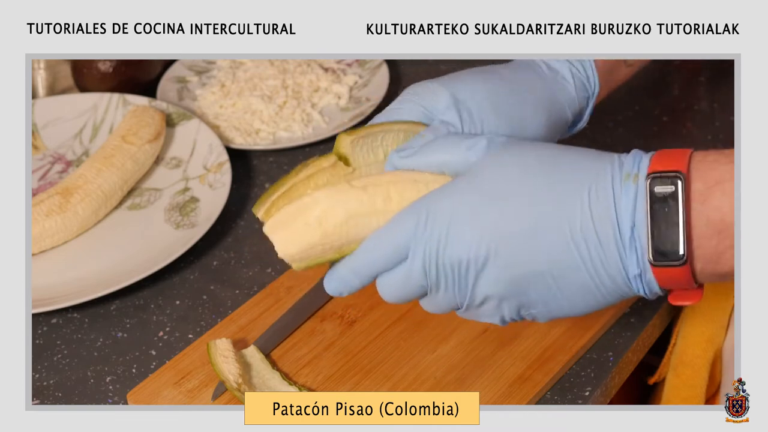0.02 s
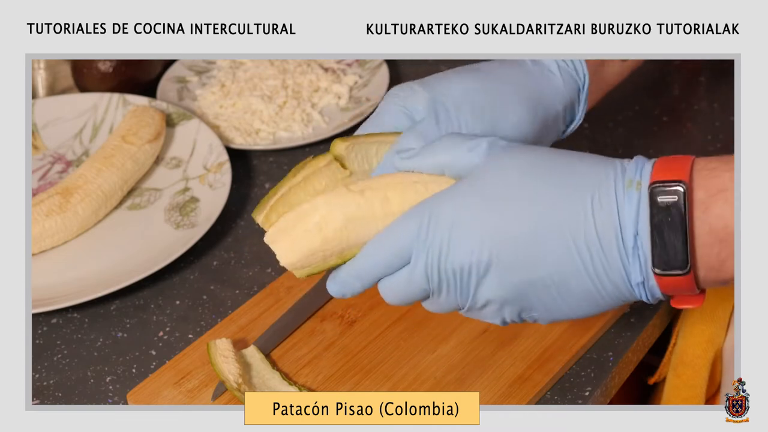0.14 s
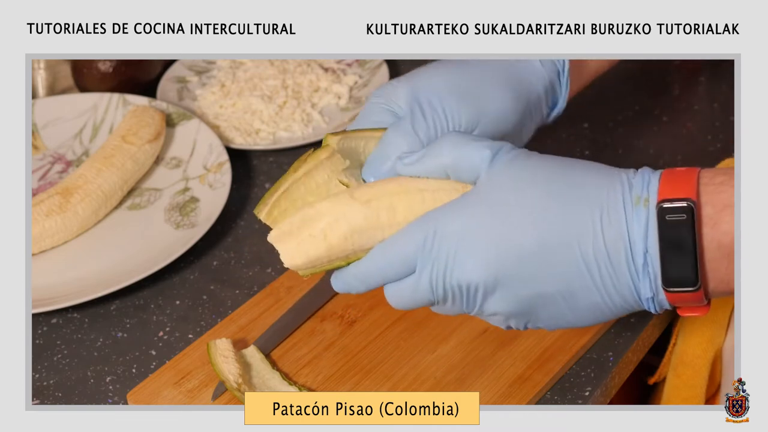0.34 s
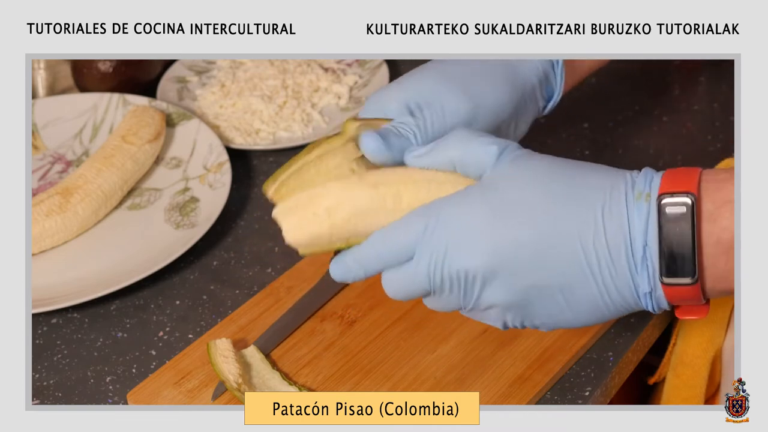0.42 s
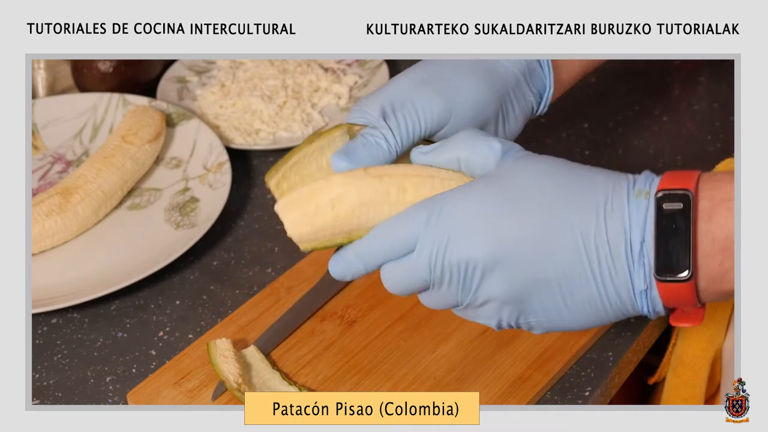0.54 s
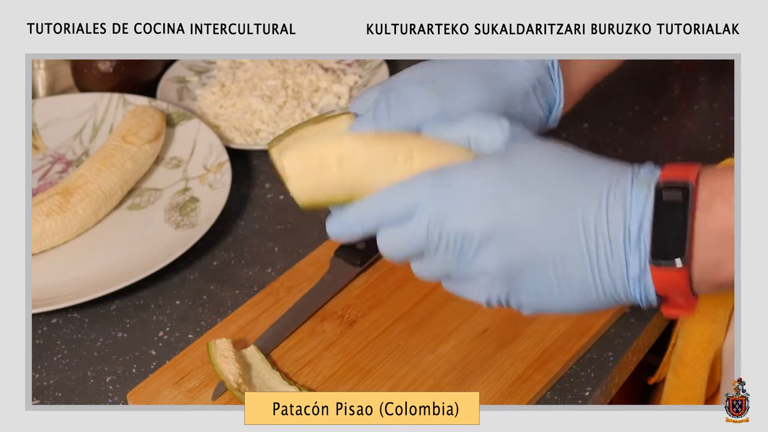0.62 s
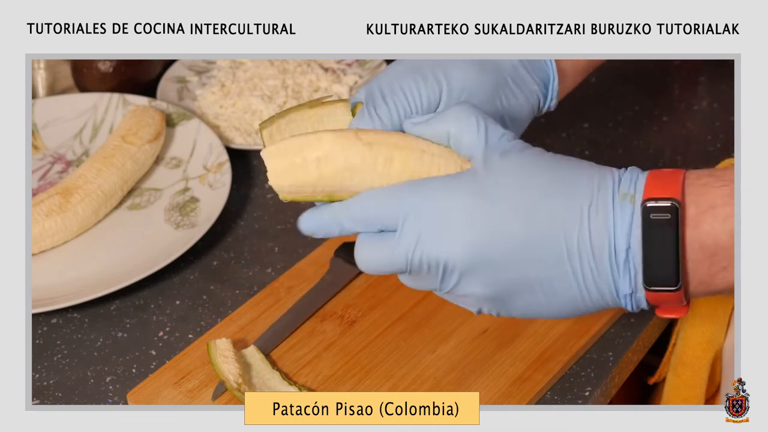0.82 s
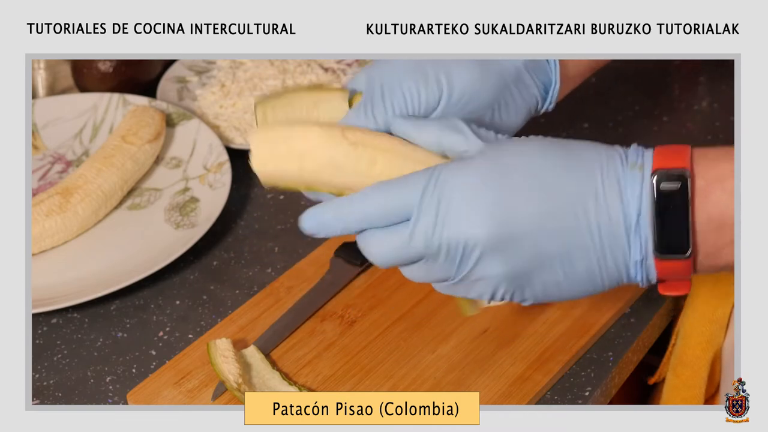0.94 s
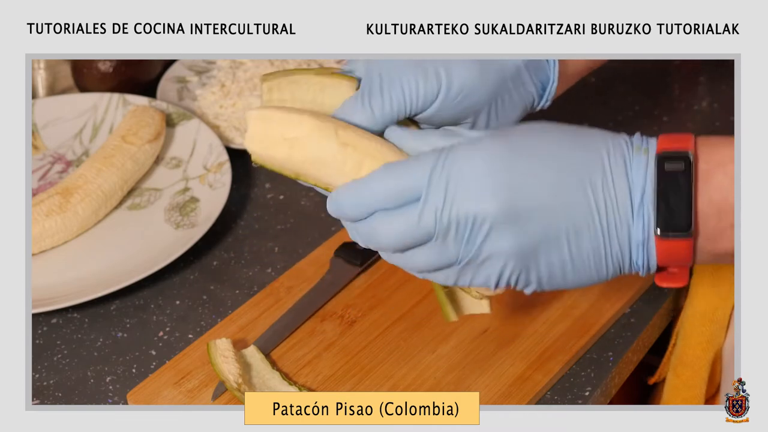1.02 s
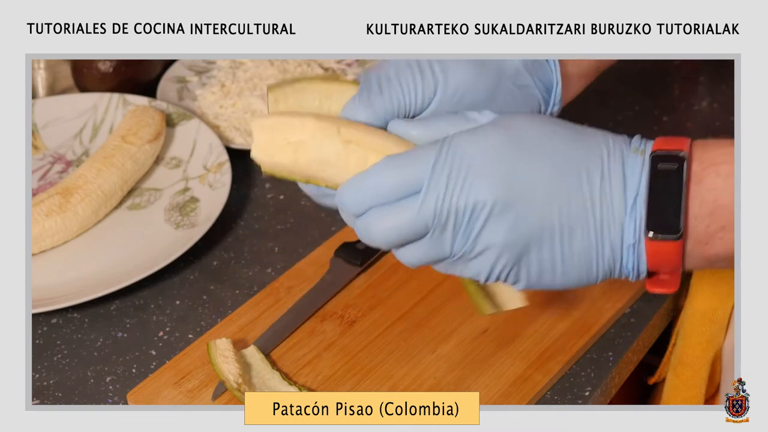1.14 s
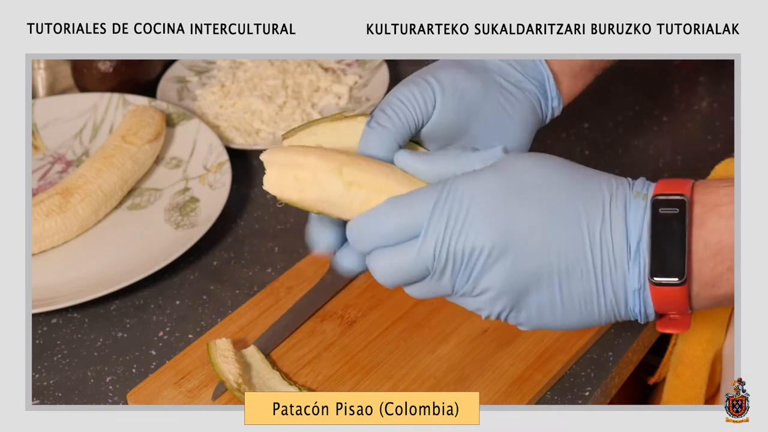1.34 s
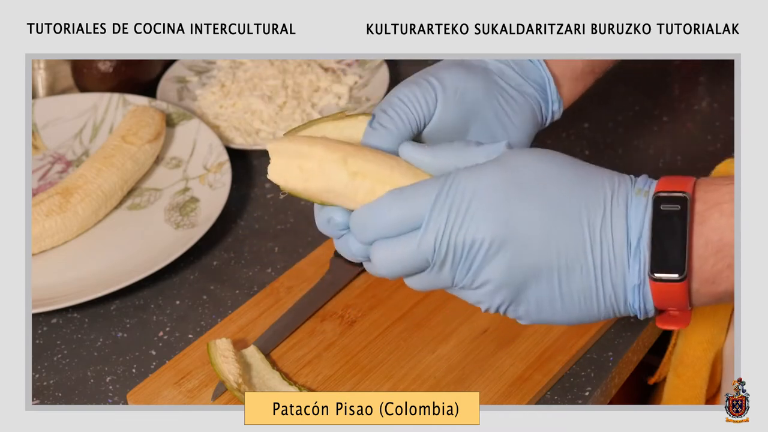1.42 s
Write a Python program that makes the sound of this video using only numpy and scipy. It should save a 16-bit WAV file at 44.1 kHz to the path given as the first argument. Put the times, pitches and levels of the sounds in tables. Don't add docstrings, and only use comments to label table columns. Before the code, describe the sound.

Plantain skin being torn off in sharp snaps and short crackles, over faint kitchen hum

```python
import sys
import numpy as np
from scipy import signal
from scipy.fft import rfft, irfft, next_fast_len
from scipy.io import wavfile
from scipy.ndimage import map_coordinates

SR = 44100
rng = np.random.default_rng(int(sys.argv[2]) if len(sys.argv) > 2 else 0)


def materialize(psi):
    bounded = np.clip(np.atleast_2d(psi).T, -1, 1)
    quanta = np.round(bounded * 32767).astype(np.int16)
    wavfile.write(sys.argv[1], SR, quanta)


def voltage_ratio(level):
    return 10 ** (np.asarray(level, float) / 20)


N = 66150
T_S = np.arange(N) / SR

# f/Hz, density/dB per Hz
AIR_SPECTRUM = [(25, -32), (50, -16.5), (100, -17.5), (300, -12), (480, -18), (1100, -14), (2000, -21),
                (7000, -27.5), (15500, -40)]
# f/Hz, rms level/dB, unsteadiness/dB
APPLIANCE_TONES = [(49.5, -77, 0), (102.2, -73, -3), (147.7, -77, 2), (328.3, -68.5, 2), (690, -80, 5.5),
                   (885, -74.5, 0.5), (1104, -81, 3.5), (1338, -76, -3)]
# centre t/s, length/s, level/dB, f/Hz
PALM_RUBS = [(0.036, 0.055, -54.5, 269), (0.12, 0.028, -56, 273), (0.228, 0.025, -51.5, 297),
             (.37, .04, -61.5, 310), (1.345, 0.031, -63, 206), (1.348, 0.03, -59.5, 470),
             (1.44, 0.073, -63, 303), (0.028, 0.075, -62.5, 710), (0.435, .07, -66.5, 2900),
             (0.437, 0.044, -69, 8400), (1.27, .03, -64, 109), (.235, .012, -59, 120),
             (0.7, 0.14, -70, 9000)]
# centre t/s, length/s, level/dB, f/Hz
SHORT_RUB = (1.05, .005, -62, 3500)
# t/s, peak level/dB, hollow body share/dB, burst t60/s
FIBRE_SNAPS = [(0.0276, -49, -10, 0.015), (0.056, -47, -2, .008), (.0657, -44, 1, 0.0073),
               (.0815, -40, -10, .009), (0.1055, -42, -4, .009), (0.1143, -37.5, 2, 0.0091),
               (0.13, -46, -6, 0.006), (0.1356, -37, 17, .008), (0.182, -25.5, 2, 0.0089),
               (0.2125, -16, 8, 0.016), (0.228, -24, -1, 0.023), (.393, -51, -4, 0.014),
               (0.5987, -31.5, -12, 0.0069), (.634, -24, -24, 0.039), (0.14, -45, -10, .009),
               (1.103, -44, -14, .007), (1.126, -45, -4, 0.0096), (1.154, -25, -1, 0.021),
               (1.169, -26, -1, 0.021), (1.1925, -28.5, 4, 0.015), (1.2003, -32, -3, .008),
               (1.2024, -23.5, 1, 0.03), (1.228, -21, -8, 0.011), (1.2316, -28, -2, 0.013),
               (1.2854, -42.5, -21, .007), (1.4242, -49, -15, 0.0097), (1.4456, -51, -6, 0.01),
               (1.4592, -40, -18, 0.0054), (1.4904, -31, -19, 0.0069), (1.4974, -34, -13, 0.01)]
# f/Hz, width/Hz, level/dB
SKIN_MODES = [(1110, 1970, -6), (3200, 900, 1.5), (4400, 500, -3.5), (6100, 570, 3.5), (9040, 1660, -4),
              (12300, 2400, -8.5)]
BODY_SHARE = [1, .6, .4, 0, 0, 0]
# peak t/s, level/dB, rise/dB per s, fall/dB per s, flap f/Hz
TEAR_STROKES = [
    (.108, -53.5, 303, 63, 8000),
    (.145, -61.5, 198, 131, 11300),
    (0.229, -42.5, 1500, 434, 3930),
    (.638, -35, 560, 1600, 4200),
    (0.659, -45, 177, 421, 4050),
    (1.127, -57, 598, 400, 6000),
    (1.21, -48.5, 347, 246, 3200),
    (1.233, -53, 1200, 422, 6100),
    (1.426, -60, 900, 250, 11300),
    (1.498, -60.5, 255, 298, 6050),
]
# f/Hz, density/dB per Hz
FIBRE_SPECTRUM = [(400, -6), (1200, -0.5), (2500, -13), (4100, -6.5), (5000, -24), (6200, -12), (10600, -2),
                  (15500, -13.5)]
POP_TIMES = [
    .2142,
    .229,
    .236,
    .629,
    .157,
]
# peak level/dB, ring level/dB, push f/Hz
SKIN_POPS = [
    (-13.5, -32, 1500),
    (-24, -32, 790),
    (-29, -31, 1200),
    (-27, -43.5, 1400),
    (-40.5, -48.5, 1700),
]
# f/Hz, level/dB, t60/s
FRUIT_MODES = [(284, -9.5, 0.23), (913, -8, 0.18), (1195, 2, 0.17), (1320, -7, 0.11), (1435, -16.5, 0.12),
               (1440, -19.5, 0.22), (1730, -38, 0.14), (1940, -11.5, 0.15), (2110, -14, 0.16),
               (3050, -20.5, 0.31), (3270, -25, 0.092), (3660, -19.5, 0.16)]
# f/Hz, t60/s
ROOM_DECAY = [(200, 0.38), (1200, 0.24), (5000, 0.26), (14000, 0.08)]

AIR_DB, WET_DB = -58.5, -11
SNAP_LAG_S = 0.0013
GRAINS_PER_S, GRAIN_HZ, GRAIN_SPREAD_OCT, GRAIN_SPREAD_DB, GRAIN_CYCLES = 3500, 8600, 0.54, 4, 1.6
GRAIN_SAMPLES = 128
HISS_DB, FLAP_DB, FLAP_REL_WIDTH = 1, -12, 0.07
EDGE_DB, EDGE_STEEPENS = 16, 3.7
BELLY_HZ, BELLY_DB, BELLY_T60_S, BELLY_ONSET_S = 730, -5.5, 0.019, 0.00033
RING_T60_SHARE, RING_ONSET_S = 0.42, 0.00086
RUMBLE_CUT_HZ, TOP_HZ, LEAK_DB = 138, 15700, -34


def unit(x):
    return x / np.sqrt(np.mean(x ** 2) + 1e-20)


def along(points, hz):
    f, value = np.transpose(points)
    return np.interp(np.log(hz + 1), np.log(f + 1), value)


def wobble(rate_hz):
    knots = rng.standard_normal(int(N * rate_hz / SR) + 4)
    return map_coordinates(knots, [T_S * rate_hz])


def filtered(x, response):
    size = next_fast_len(x.shape[-1] + 8192)
    hz = np.fft.rfftfreq(size, 1 / SR)
    return irfft(rfft(x, size) * response(hz), size)[..., :x.shape[-1]]


def peak(f, hz, width_hz):
    return 1j * f * width_hz / (hz * hz - f * f + 1j * f * width_hz)


def add(track, start_s, sound):
    part = track[round(start_s * SR):][:len(sound)]
    part += sound[:len(part)]


def background():
    noise = rng.standard_normal(N)
    air = unit(filtered(noise, lambda f: voltage_ratio(along(AIR_SPECTRUM, f)) * (f > 25)))
    out = air * voltage_ratio(AIR_DB - 0.7 + 0.23 * wobble(9.4))
    for hz, rms_db, shake_db in APPLIANCE_TONES:
        level = np.sqrt(2) * voltage_ratio(rms_db + shake_db * wobble(14))
        phase = 2 * np.pi * hz * T_S + 0.24 * shake_db * wobble(12)
        out += level * np.sin(phase)
    return out


def rubs():
    out = np.zeros(N)
    for centre_s, length_s, db, hz in PALM_RUBS + [SHORT_RUB]:
        swell = np.exp(-0.5 * ((T_S - centre_s) / length_s) ** 2)
        noise = filtered(rng.standard_normal(N), lambda f: peak(f, hz, 0.41 * hz) ** 2)
        out += voltage_ratio(db) * swell * unit(noise)
    return out


def snaps():
    out = np.zeros(N)
    t = np.arange(2048) / SR
    for start_s, db, body_db, t60_s in FIBRE_SNAPS:
        burst = 0.32 * rng.standard_normal(len(t)) * voltage_ratio(-60 * t / t60_s)
        burst[0] -= 1.8
        tint_db = rng.normal(0, 2.6, len(SKIN_MODES)) + body_db * np.array(BODY_SHARE)

        def skin(f):
            total = 0.082
            for k, (hz, width_hz, mode_db) in enumerate(SKIN_MODES):
                total = total + (-1) ** k * voltage_ratio(mode_db + tint_db[k]) * peak(f, hz, width_hz)
            return total

        sound = filtered(burst, skin)
        add(out, start_s + SNAP_LAG_S, voltage_ratio(db) * sound / np.abs(sound).max())
    return out


def crackle():
    count = int(GRAINS_PER_S * N / SR)
    place, rarity = rng.random((2, count, 1))
    octaves, sign = rng.standard_normal((2, count, 1))
    hz = np.clip(GRAIN_HZ * 2 ** (GRAIN_SPREAD_OCT * octaves), 1500, 15000)
    t = np.arange(GRAIN_SAMPLES) / SR
    level = voltage_ratio(-GRAIN_SPREAD_DB * np.log(rarity + 1 / 30)) * np.sign(sign)
    ticks = level * np.sin(2 * np.pi * hz * t) * np.exp(-np.pi * hz * t / GRAIN_CYCLES)
    where = (place * N).astype(int) + np.arange(GRAIN_SAMPLES)
    return unit(np.bincount(where.ravel(), ticks.ravel(), N + GRAIN_SAMPLES)[:N])


def tears():
    noise = rng.standard_normal(N)
    hiss = unit(filtered(noise, lambda f: voltage_ratio(along(FIBRE_SPECTRUM, f)) * (f > 300)))
    source = unit(crackle() + voltage_ratio(HISS_DB) * hiss)
    clumps = voltage_ratio(2.7 * wobble(220))
    out = np.zeros(N)
    for peak_s, db, rise_db_s, fall_db_s, flap_hz in TEAR_STROKES:
        flap = unit(filtered(source, lambda f: peak(f, flap_hz, FLAP_REL_WIDTH * flap_hz)))
        under_db = np.where(T_S < peak_s, rise_db_s * (peak_s - T_S), fall_db_s * (T_S - peak_s))
        edge_db = EDGE_STEEPENS * np.maximum(under_db - EDGE_DB, 0)
        out += voltage_ratio(db - under_db - edge_db) * (source + voltage_ratio(FLAP_DB) * flap)
    return clumps * out


def fruit_ring(t):
    ring = np.zeros(len(t))
    for hz, db, t60_s in FRUIT_MODES:
        level = voltage_ratio(db + rng.normal(0, 1.4) - 60 * t / (RING_T60_SHARE * t60_s))
        drift = 0.049 * np.cumsum(rng.standard_normal(len(t)))
        ring += level * np.sin(2 * np.pi * (hz * t + rng.random()) + drift)
    return ring * (1 - np.exp(-t / RING_ONSET_S))


def pops():
    out = np.zeros(N)
    t = np.arange(SR // 4) / SR
    for start_s, (db, ring_db, push_hz) in zip(POP_TIMES, SKIN_POPS):
        cycles = t * push_hz
        push = np.sin(2 * np.pi * cycles) * cycles * np.exp(-2.05 * cycles)
        push = push / np.abs(push).max()
        belly = voltage_ratio(BELLY_DB - 60 * t / BELLY_T60_S) * np.sin(2 * np.pi * BELLY_HZ * t)
        belly = belly * (1 - np.exp(-t / BELLY_ONSET_S))
        add(out, start_s, voltage_ratio(db) * (push + belly) + voltage_ratio(ring_db) * fruit_ring(t))
    return out


def kitchen(x):
    hz, t, bins = signal.stft(rng.standard_normal(SR // 2), SR, nperseg=256)
    decay = voltage_ratio(-60 * t / along(ROOM_DECAY, hz)[:, None])
    tail = signal.istft(bins * decay, SR, nperseg=256)[1]
    delayed = np.pad(x, (120, 0))
    return signal.fftconvolve(delayed, tail / np.linalg.norm(tail))[:N]


def scene():
    hands = snaps() + tears() + pops()
    near = filtered(hands, lambda f: (1j * f / (RUMBLE_CUT_HZ + 1j * f)) ** 2)
    return (background() + rubs() + near + voltage_ratio(WET_DB) * kitchen(near))[None]


def roll_off(x):
    return signal.sosfilt(signal.butter(12, 15690, fs=SR, output="sos"), x)


def record(dry):
    mix = filtered(dry, lambda f: np.where(f < TOP_HZ, 1, voltage_ratio(LEAK_DB)))
    return roll_off(mix)


dry = scene()
out = record(dry)
materialize(out)
```